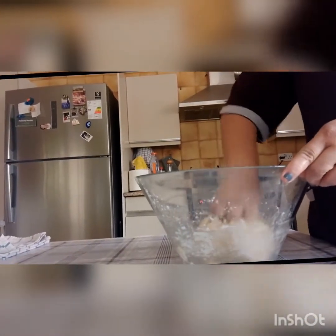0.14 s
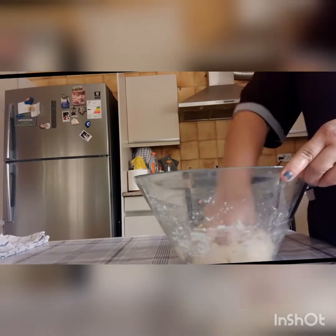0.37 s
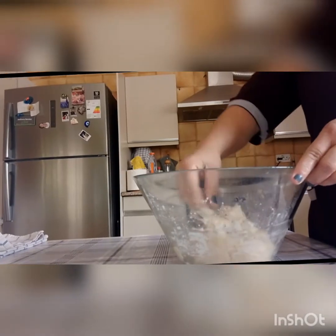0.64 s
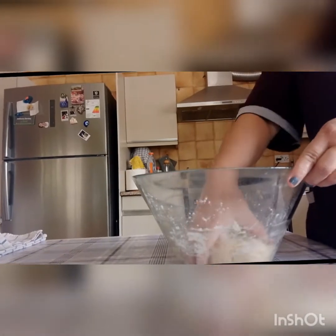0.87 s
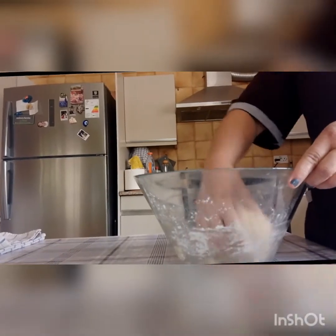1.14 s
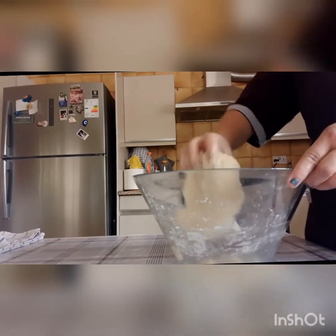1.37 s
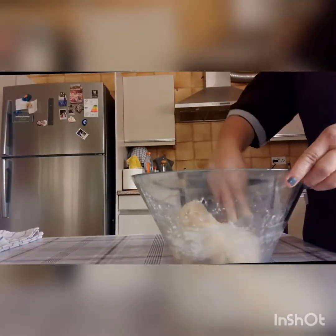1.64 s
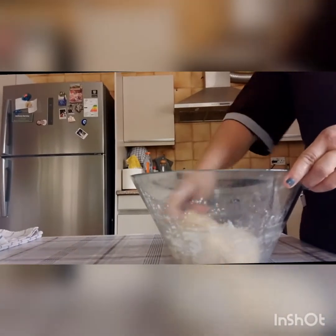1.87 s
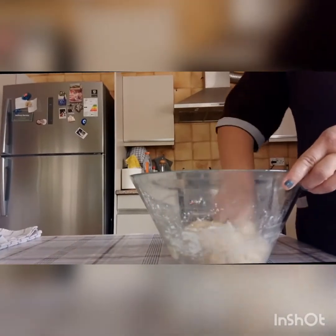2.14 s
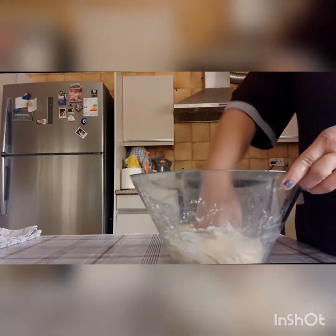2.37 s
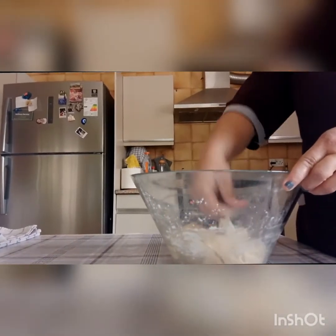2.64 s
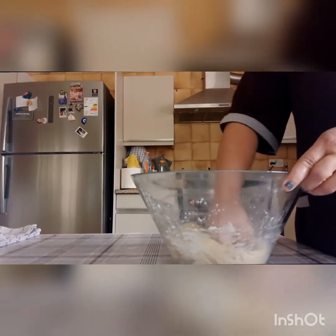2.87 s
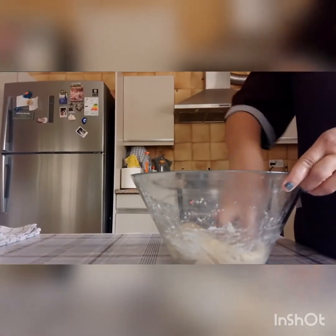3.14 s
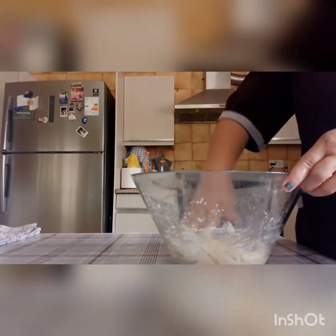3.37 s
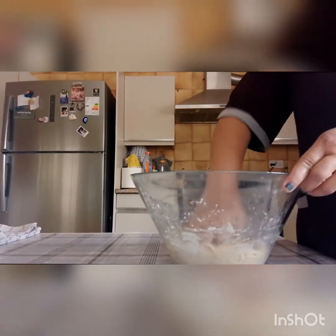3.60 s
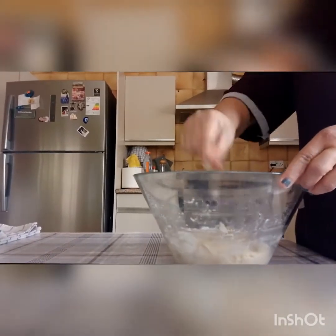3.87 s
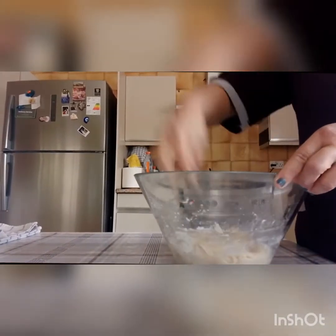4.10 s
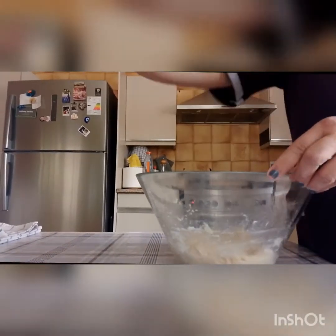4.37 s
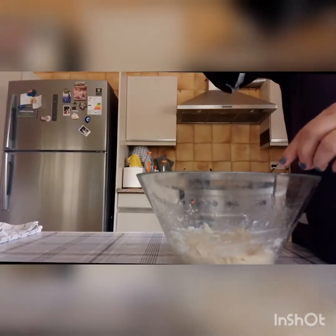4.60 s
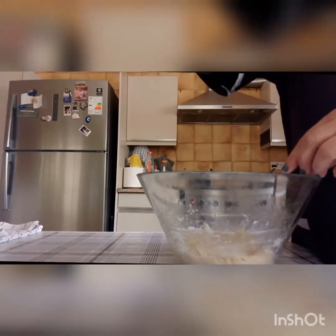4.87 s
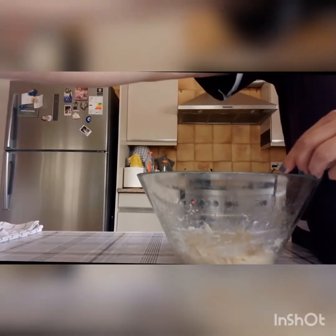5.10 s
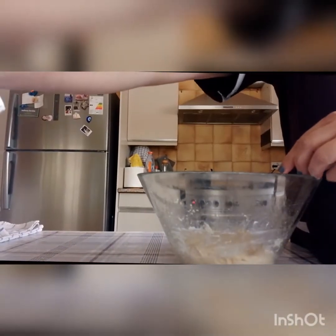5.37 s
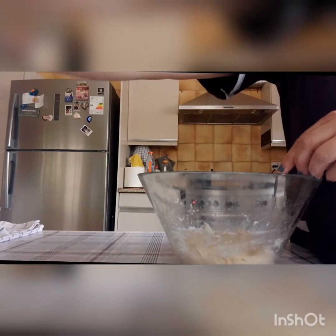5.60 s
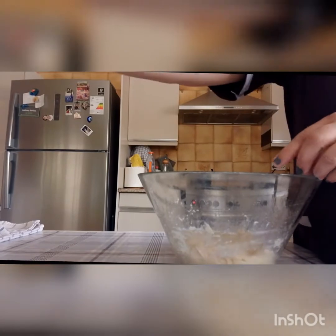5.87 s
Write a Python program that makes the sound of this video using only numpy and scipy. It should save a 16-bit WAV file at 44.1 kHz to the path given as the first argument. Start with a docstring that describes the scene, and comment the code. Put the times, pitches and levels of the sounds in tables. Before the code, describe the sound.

Faint rustling as a hand works sticky dough in a glass bowl, one table thud with a clink, then a loud close rubbing scrape.

```python
"""A hand kneads dough in a glass bowl on a kitchen table, close to the microphone, in mono.
Sleeve and dough rustle as fine grit; sticky dough snaps off the fingers as single clicks.
The lump drops and the table booms as dying tones into the tiled room, while the bowl clinks and rings.
Then something is dragged and rubbed close by: stick-slip grit hisses and rings the rubbed thing.
Behind it all lie the murmur of the bowl's air, a slowly sinking drone and a steady hiss."""
import sys
import numpy as np
from scipy import signal
from scipy.fft import irfft
from scipy.io import wavfile

SR = 44100
rng = np.random.default_rng(int(sys.argv[2]) if len(sys.argv) > 2 else 0)


def master_out(mix):
    """Clip the mix to full scale and print it as 16-bit PCM to the path in sys.argv[1]."""
    frames = np.transpose(np.atleast_2d(mix))
    ceiling = np.clip(frames, -1, 1)
    pcm = np.round(ceiling * 32767).astype(np.int16)
    wavfile.write(sys.argv[1], SR, pcm)


def boost_factor(decibels):
    """Convert a level in decibels to a linear amplitude factor."""
    exponent = np.asarray(decibels, float) / 20
    return 10 ** exponent


N = 264159  # length in samples

RUSTLE_END_S = 4.51  # the hand starts to leave the bowl

# Tones of the table top. Each row: pitch in Hz, relative level in dB, time to die by 60 dB in seconds.
TABLE_TONES = [(118, -7, 0.33), (267, -17, 0.19), (302.5, -8.5, 0.4), (343, 1.5, 0.036), (420, -16, 0.14),
               (486, -1.5, 0.023), (570, -3.5, 0.014), (804, -8, 0.025), (1004, -17, 0.075)]
# The rub through time. Each row: time in seconds, level in dB of the hiss that follows speed,
# level in dB of the body's ringing that follows pressure (both before tilt and presses).
RUB_COURSE = [(4.519, -74, -78), (4.54, -55.5, -61.5), (4.605, -43.5, -63.5), (4.69, -40.5, -60),
              (4.81, -39.5, -54), (4.88, -42.5, -54.5), (4.95, -45, -56), (5.0, -43.5, -53.5),
              (5.12, -41, -53.5), (5.18, -43, -53.5), (5.218, -45, -57.5), (5.31, -43.5, -54),
              (5.37, -47, -57.5), (5.41, -54, -65), (5.5, -46.5, -62.5), (5.57, -48, -65),
              (5.63, -42.5, -56.5), (5.7, -43.5, -55.5), (5.78, -40, -56.5), (5.86, -43.5, -59.5),
              (5.91, -48.5, -65.5), (5.935, -53, -73), (5.98, -54, -73)]
# Echoes from table top and bowl wall, close to the microphone.
# Each row: delay in milliseconds, level in dB against the direct sound.
NEAR_ECHOES = [(.65, -14.5), (1.098, -18.5), (1.501, -8.5), (1.799, -10.5)]


def evened(x):
    """Scales a sound to rms 1."""
    return x / np.sqrt(np.mean(x ** 2) + 1e-20)


def read(points, hz):
    """Reads a spectrum between its points, on a log-frequency axis."""
    f, value = np.transpose(points)
    return np.interp(np.log(hz + 1), np.log(f + 1), value)


def columns(rows, t):
    """Reads every column of a time curve at times t."""
    s, *values = np.transpose(rows)
    return [np.interp(t, s, v) for v in values]


def add(mix, s, sound):
    """Mixes a sound in at time s, in seconds."""
    part = mix[round(s * SR):][:len(sound)]
    part += sound[:len(part)]


def shape(x, db_of, size=256):
    """Weights the short-time spectrum of x by db_of(hz, t), a gain in dB."""
    overlap = size * 3 // 4
    hz, t, z = signal.stft(x, SR, nperseg=size, noverlap=overlap)
    y = signal.istft(z * boost_factor(db_of(hz[:, None], t)), SR, nperseg=size, noverlap=overlap)[1]
    return y[:len(x)]


def high_pass(x, hz):
    """Cuts the bass that a small source cannot radiate."""
    return signal.sosfilt(signal.butter(2, hz, "high", fs=SR, output="sos"), x)


def band_pass(x, low_hz, top_hz):
    """Small things radiate little bass; damping eats the treble."""
    return signal.sosfilt(signal.butter(2, [low_hz, top_hz], "band", fs=SR, output="sos"), x)


def resonate(x, modes):
    """Sums resonances of alternating sign, each of about its own dB gain at its centre."""
    out = np.zeros(len(x))
    for k, (hz, width, db) in enumerate(modes):
        pole = np.exp((2j * np.pi * hz - np.pi * width) / SR)
        rung = 2 * signal.lfilter([1 - abs(pole)], [1, -pole], x).real
        out += (-1) ** k * boost_factor(db) * rung
    return out


def ring(modes, contact_ms, cut_hz):
    """Dying tones pushed by a force that swells and fades; scaled to peak 1."""
    t = np.arange(SR // 2) / SR
    tones = sum(boost_factor(db - 60 * t / t60) * np.sin(2 * np.pi * hz * t) for hz, db, t60 in modes)
    u = t[:1024] * 4000 / contact_ms  # the force peaks at u = 2, half the contact time
    force = u ** 2 * np.exp(-u)
    y = high_pass(signal.oaconvolve(tones, force), cut_hz)
    return y / abs(y).max()


def swells(rows, t, fall=1.17):
    """Summed gain of bell-shaped swells that fall more slowly than they rise."""
    power = 0
    for s, db, length in rows:
        u = 2 * (t - s) / length
        power = power + boost_factor(db) ** 2 * np.exp(-np.where(u > 0, u / fall, u) ** 2)
    return np.sqrt(power)


def grit(per_s, spread_db, smooth):
    """Stick-slip clicks of uneven size and random sign, over a smooth hiss (share 0-1)."""
    size = boost_factor(spread_db * np.minimum(rng.exponential(1, N), 4)) * rng.choice([-1., 1.], N)
    clicks = evened(size * (rng.random(N) < per_s / SR))
    smooth = np.clip(smooth, 0, 1)
    return np.sqrt(1 - smooth) * clicks + np.sqrt(smooth) * rng.standard_normal(N)


def friction_db(hz, tilt):
    """The colour of dry friction; tilt, in dB per octave, leans it towards the bass about 12 kHz."""
    # Dry friction, tilted up by the microphone's treble peak.
    # Each row: frequency in Hz, relative level in dB per Hz.
    dry_colour = [(500, -66), (2000, -26.5), (3500, -16), (3900, -17), (4300, -17), (5200, -16.5),
                  (6900, -12.5), (8000, -10), (10000, -5), (12600, 4.5), (14000, 2.5), (15600, -3.5)]
    return read(dry_colour, hz) + tilt * np.log2(12000 / np.maximum(hz, 1000))


def friction(x, gain, tilt_at):
    """Colours grit by a tilt that changes with time; gain is its level at zero tilt."""
    tilted = shape(x, lambda hz, t: friction_db(hz, tilt_at(t)))
    scale = np.std(shape(x, lambda hz, t: friction_db(hz, 0 * t)))
    return tilted / scale * gain


def rustle():
    """Fine grit under the moving hand, fading out as the rub begins."""
    # Strokes of the hand through the dough.
    # Each row: time of the peak in seconds, level in dB before tilt, length in seconds.
    hand_strokes = [(0.0, -75.5, 0.17), (0.263, -76, 0.3), (0.4, -73.5, .2), (0.8, -76.5, .06),
                    (1.076, -68.5, 0.12), (1.239, -67.5, 0.082), (1.555, -62, 0.073), (2.025, -75.5, 0.077),
                    (2.465, -71, 0.11), (2.74, -80, 0.088), (3.11, -71, 0.24), (3.287, -72.5, 0.037),
                    (3.44, -74, 0.31), (3.74, -67.5, 0.17), (3.86, -65.5, 0.12), (4.015, -71.5, 0.11),
                    (4.13, -72, 0.045), (4.21, -66.5, 0.14), (4.32, -68.5, 0.12), (4.47, -70, 0.18)]
    rest_db, tilt = -79, 4.97  # the sleeve's floor before the fade; dB per octave towards the bass
    t = np.arange(N) / SR
    leave = np.clip((RUSTLE_END_S - t) / 0.067 + 1, 0, 1)
    gain = np.hypot(swells(hand_strokes, t), boost_factor(rest_db))
    return leave * friction(grit(2200, 3.5, 0.67), gain, lambda at: tilt + 0 * at)


def snaps():
    """A thread of dough tears: one sharp click in the friction colour."""
    # Each row: time in seconds, peak in dB before echoes, tilt in dB per octave towards the bass.
    tears = [(3.1055, -50, 2), (3.7918, -37, -4), (3.8697, -29.5, -6), (3.9016, -44, 3), (3.949, -49, -1),
             (3.9955, -47, -4), (4.003, -48, -3), (4.011, -49, -3), (4.0468, -40.5, 1), (4.109, -48, -4),
             (4.118, -47, -4), (4.159, -46, -4), (4.190, -43, -1), (4.3183, -38, -2), (4.329, -32.5, -4),
             (4.3337, -38, -4)]
    out, hz = np.zeros(N), np.fft.rfftfreq(512, 1 / SR)
    for s, db, tilt in tears:
        snap = np.roll(irfft(boost_factor(friction_db(hz, tilt))), 256)  # click moved to the middle
        add(out, s - 256 / SR, boost_factor(db) * snap / abs(snap).max())
    return out


def thuds():
    """Each thud sounds the table top's dying tones and a deep rocking of the table."""
    # Thuds: two soft ones, the drop at 1.553 s, then late returns from the table and room
    # at 1.584 and 1.617 s. Each row: time in seconds, peak in dB before the rocking is added,
    # length of the push in milliseconds.
    table_thuds = [(0.823, -49.5, 2.6), (1.509, -50.5, 5), (1.553, -25, 1.05), (1.584, -31, 1.8),
                   (1.617, -38, 1.4)]
    rock_hz, rock_db, rock_t60_s = 43, -33, 0.091  # level against the thud, for a push of 1 ms
    out, t = np.zeros(N), np.arange(SR // 2) / SR
    rock = boost_factor(rock_db - 60 * t / rock_t60_s) * np.sin(2 * np.pi * rock_hz * t)
    for s, db, push_ms in table_thuds:
        add(out, s, boost_factor(db) * ring(TABLE_TONES, push_ms, cut_hz=415))
        add(out, s, boost_factor(db) * push_ms * rock)  # a longer push rocks it harder
    return out


def clinks():
    """One tick, then a faint rattle, rings the bowl, which the dough damps."""
    # Each row: time in seconds, peak in dB before the room's echo.
    bowl_clinks = [(1.554, -51), (1.5893, -33.5)]
    # Resonances of the bowl. Each row: pitch in Hz, width in Hz, relative level in dB.
    bowl_modes = [(1180, 380, 7.5), (2210, 250, 8), (2620, 350, 5.5), (4030, 500, 1.5), (5200, 1900, -8.5),
                  (6760, 1000, -17), (10800, 830, -12.5)]
    out, t = np.zeros(N), np.arange(4096) / SR
    for s, db in bowl_clinks:
        clatter = rng.standard_normal(4096) * boost_factor(-28 - 60 * t / 0.094)
        clatter[0] = 1  # the tick
        clink = high_pass(resonate(clatter, bowl_modes), 850)
        add(out, s, boost_factor(db) * clink / abs(clink).max())
    return out


def fuzzy_tone(rows, hz, width):
    """Noise through the same resonance twice, sounding in swells."""
    mode = [(hz, width, 0)]
    tone = resonate(resonate(rng.standard_normal(N), mode), mode)
    return evened(tone) * swells(rows, np.arange(N) / SR)


def high_ring():
    """A thin high ring around the drop: a narrow band of noise in swells."""
    # Each row: time of the peak in seconds, level in dB, length in seconds.
    ring_swells = [(1.54, -72, 0.03), (1.635, -64, .04), (1.67, -77, 0.055)]
    return fuzzy_tone(ring_swells, hz=12300, width=190)


def murmur():
    """The air in the bowl murmurs while the dough is worked: a wide resonance of noise."""
    # Each row: time of the peak in seconds, level in dB, length in seconds.
    murmur_swells = [(0.0, -66.5, 0.5), (.75, -68.5, 0.58), (1.15, -68.5, 0.73)]
    return fuzzy_tone(murmur_swells, hz=790, width=880)


def grip(t):
    """Tilt, hollowness and damping of the grip at time t, changing over a short regrip."""
    # Each row: start in seconds, base tilt in dB per octave towards the bass,
    # hollow sound over body in dB for a firm drag, damping of the body by the hand from 0 to 1.
    holds = [(4.519, 5, -11.5, 0.16), (4.59, 2.5, -12, 0), (4.71, 9, -7, 0.44), (4.99, 7.5, -2, .45),
             (5.22, 7.5, -1, 0.5), (5.408, -5, -4, 0.1), (5.598, -1.5, -10.5, 0.06), (5.76, 2.5, -10.5, 0)]
    regrip_s = 0.024
    s, *values = np.transpose(holds)
    steps = np.clip((t - s[1:, None]) / regrip_s, 0, 1)
    return [v[0] + np.diff(v) @ steps for v in values]


def rub_tilt(t):
    """Heavy slow rubbing is duller: the grip's tilt grows with pressure over speed."""
    hiss_db, body_db = columns(RUB_COURSE, t)
    return grip(t)[0] + 0.25 * (body_db - hiss_db)  # dB per octave for each dB


def presses(t):
    """Gain of sudden harder presses: each rises in 3 ms and lets go in 15 ms."""
    # Each row: start in seconds, length in seconds, gain in dB.
    pushes = [(4.596, 0.018, 1.5), (4.692, 0.026, 2.5), (4.743, 0.044, 4.5), (4.893, 0.045, 3),
              (5.227, 0.031, 8.5), (5.266, 0.013, 7.5)]
    press_db = 0
    for s, length, db in pushes:
        rise, release = (t - s) / 0.003, (s + length - t) / 0.015 + 1
        press_db = press_db + db * np.clip(np.minimum(rise, release), 0, 1)
    return boost_factor(press_db)


def rub():
    """Stick-slip grit hisses directly and rings the body, the hollow and the table."""
    # Resonances of the rubbed thing's body. Each row: pitch in Hz, width in Hz, relative level in dB.
    body_modes = [(1285, 120, -4), (1937, 255, 6.5), (2460, 125, 7), (2877, 120, 8.5), (3560, 210, -2),
                  (4170, 120, 4.5)]
    # Its hollow resonances. Each row: pitch in Hz, width in Hz, relative level in dB.
    hollow_modes = [(537, 180, 2.5), (666, 105, 8), (750, 146, 5)]
    # Bumps of the rubbed thing.
    # Each row: time in seconds, body peak in dB, hollow peak in dB (both before echoes).
    knocks = [(4.917, -28, -42), (5.006, -59, -33), (5.155, -36, -65)]
    firm_db, hollow_growth = -55, 0.92  # body level of a firm drag; dB of hollow per dB of body
    table_db = -20.5  # the table's level against the hollow sound
    t = np.arange(N) / SR
    start = np.clip((t - RUB_COURSE[0][0]) / 0.0046, 0, 1)
    hiss_db, body_db = columns(RUB_COURSE, t)
    _, hollowness_db, damped = grip(t)
    hollow_db = firm_db + hollow_growth * (body_db - firm_db) + hollowness_db
    damped = np.clip(damped, 0, 1)

    slips = grit(5000, 3.9, 0.53)
    hiss = friction(slips, boost_factor(hiss_db), rub_tilt)
    free = evened(band_pass(resonate(slips, body_modes), 740, 4800))
    held = evened(band_pass(grit(5000, 2.0, 0.55), 1710, 3360))  # damped body: no ringing modes
    body = np.sqrt(1 - damped) * free + np.sqrt(damped) * held
    # a brighter stroke favours the upper modes of the body
    body = shape(body, lambda hz, at: 0.35 * rub_tilt(at) * np.log2(2600 / np.clip(hz, 1200, 5000)))
    hollow = high_pass(resonate(grit(400, 4.2, .4), hollow_modes), 440)
    hollow = resonate(hollow, [(660, 840, 0)])
    # the drag also sounds the table, all but its lowest tone
    table = signal.oaconvolve(grit(340, 7.4, 0.31), ring(TABLE_TONES[1:], 2.3, cut_hz=260))[:N]

    out = hiss + boost_factor(body_db) * evened(body) + boost_factor(hollow_db) * evened(hollow)
    out += boost_factor(hollow_db + table_db) * evened(table)
    out *= start * presses(t)
    # a narrower resonance dies more slowly
    body_bump = ring([(hz, db, 3.0 / width) for hz, width, db in body_modes], 0.17, cut_hz=1800)
    hollow_bump = ring([(hz, db, 3.0 / width) for hz, width, db in hollow_modes], 0.83, cut_hz=960)
    for s, body_peak_db, hollow_peak_db in knocks:
        add(out, s, boost_factor(body_peak_db) * body_bump)
        add(out, s, boost_factor(hollow_peak_db) * hollow_bump)
    return out


def near_echoes(x):
    """Adds the first short echoes, which comb the spectrum."""
    taps = np.zeros(256)
    taps[0] = 1
    for ms, db in NEAR_ECHOES:
        taps[min(round(ms * SR / 1000), 255)] += boost_factor(db)
    return signal.oaconvolve(x, taps)[:N]


def moving_echoes(x, drift):
    """The same echoes for a moving hand: their delays wander by the share drift, so the comb shifts."""
    phases = rng.random((len(NEAR_ECHOES), 8))
    rates = np.geomspace(.3, 5, num=8)  # wander speeds in Hz

    def comb_db(hz, t):
        """Level of the direct sound plus its echoes."""
        total = 1
        for (ms, db), phase in zip(NEAR_ECHOES, phases):
            waves = [np.sin(2 * np.pi * (f * t + p)) / np.sqrt(f) for f, p in zip(rates, phase)]
            delay_s = ms / 1000 * (1 + drift * evened(sum(waves)))
            total = total + boost_factor(db) * np.exp(-2j * np.pi * hz * delay_s)
        return 20 * np.log10(abs(total) + 1e-3)
    return shape(x, comb_db, size=512)


def kitchen(x):
    """The tiled room's echo: sparse taps of random sign, each band dying at its own speed."""
    # Each row: frequency in Hz, time to die by 60 dB in seconds.
    decay = [(125, 0.82), (300, 0.82), (1000, 0.98), (3000, 0.32), (8000, 0.11), (14000, 0.22)]
    taps = np.zeros(SR)
    at = np.arange(700, SR - 20, 20)
    taps[at + rng.integers(0, 20, len(at))] = rng.choice([-1., 1.], len(at))
    tail = shape(taps, lambda hz, t: -60 * t / read(decay, hz), size=512)
    return signal.fftconvolve(x, tail / np.linalg.norm(tail))[:N]


def drone():
    """Low room noise that slowly dies down until the rustle ends, over a steady hiss."""
    # Each row: frequency in Hz, relative level in dB per Hz.
    colour = [(15, -37), (25, -10), (113, -14.5), (160, -30), (273, -1.5), (313, -5), (468, -9), (521, -9),
              (739, -9), (1110, -14), (1260, -16), (2350, -21.5), (7260, -22), (12400, -25.5),
              (15400, -21.5)]
    level_db, sag_db_per_s, hiss_db = -66.5, 1.1, -83.5
    noise = rng.standard_normal((2, N))

    def low_db(hz, t):
        """The colour, fading out above 2500 Hz."""
        return read(colour, hz) - 10 * np.log10(1 + (hz / 2500) ** 4) + 0 * t

    def high_db(hz, t):
        """The colour, fading out below 2500 Hz."""
        return read(colour, hz) - 10 * np.log10(1 + (2500 / (hz + 1)) ** 4) + 0 * t
    low = evened(shape(noise[0], low_db, size=2048))
    hiss = evened(shape(noise[1], high_db))
    sinking_db = level_db - sag_db_per_s * np.minimum(np.arange(N) / SR, RUSTLE_END_S)
    return boost_factor(sinking_db) * low + boost_factor(hiss_db) * hiss


def scene():
    """All sources with their echoes, the same in both channels."""
    ticks, low, glass = snaps(), thuds(), clinks()
    close = near_echoes(ticks) + moving_echoes(rub() + rustle(), drift=0.075)
    bowl = glass + high_ring() + murmur()
    wet = kitchen(boost_factor(-10.5) * low + boost_factor(-7.5) * glass + boost_factor(-14) * ticks)
    mono = low + bowl + close + wet + drone()
    return np.array([mono, mono])


def band_limit(x):
    """A steep low-pass at the top of the band."""
    return signal.sosfilt(signal.butter(12, 16450, fs=SR, output="sos"), x)


def record(dry):
    """Cuts the treble steeply at 15620 Hz and finishes the mix."""
    edge = signal.firwin(511, 15620, window=("kaiser", 8), fs=SR)
    mix = signal.oaconvolve(dry, edge[None], "same")
    return band_limit(mix)


dry = scene()
out = record(dry)
master_out(out)
```